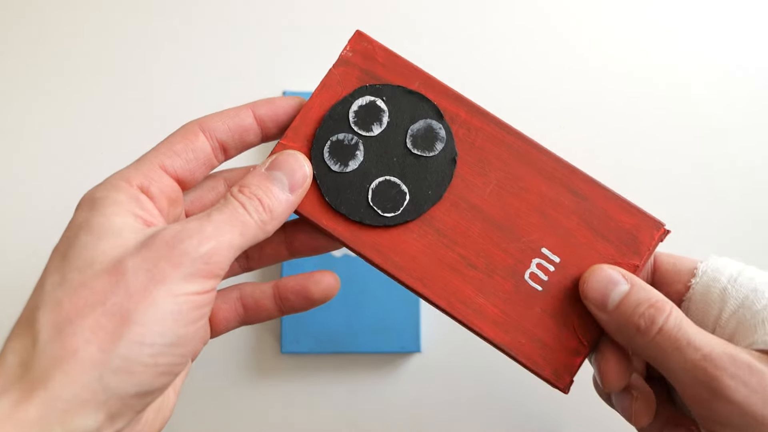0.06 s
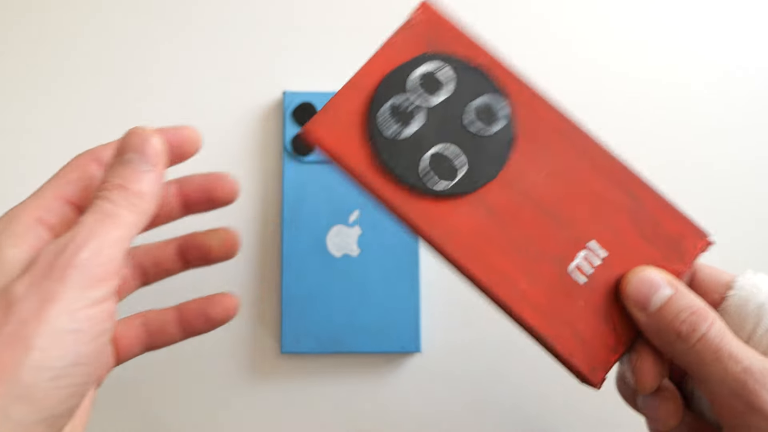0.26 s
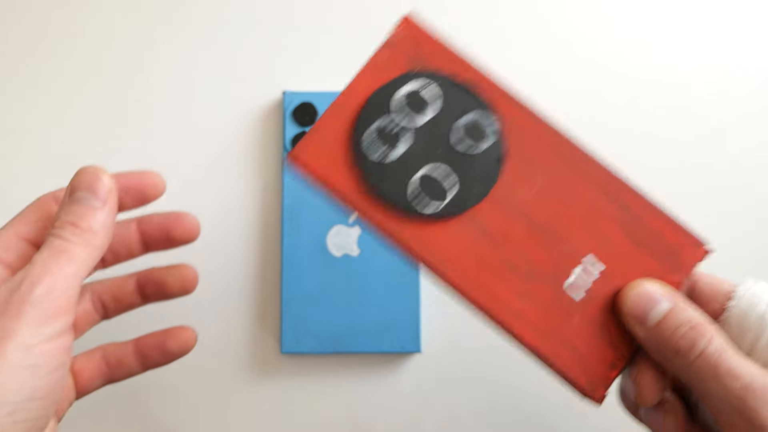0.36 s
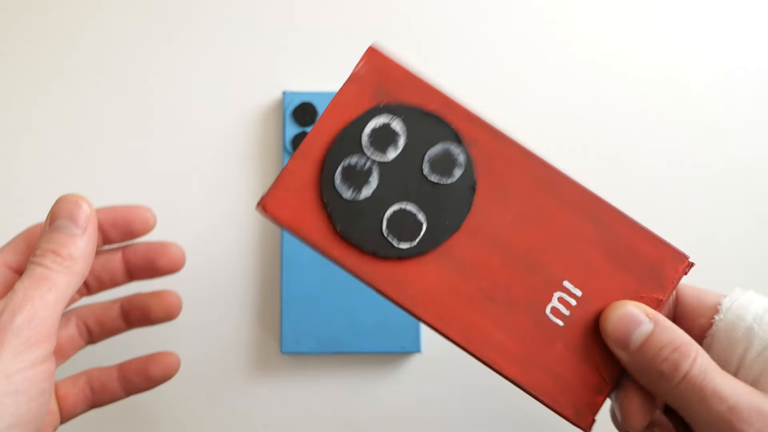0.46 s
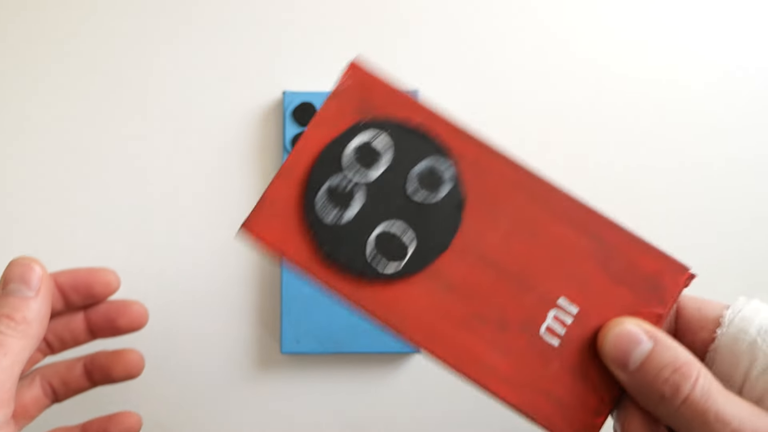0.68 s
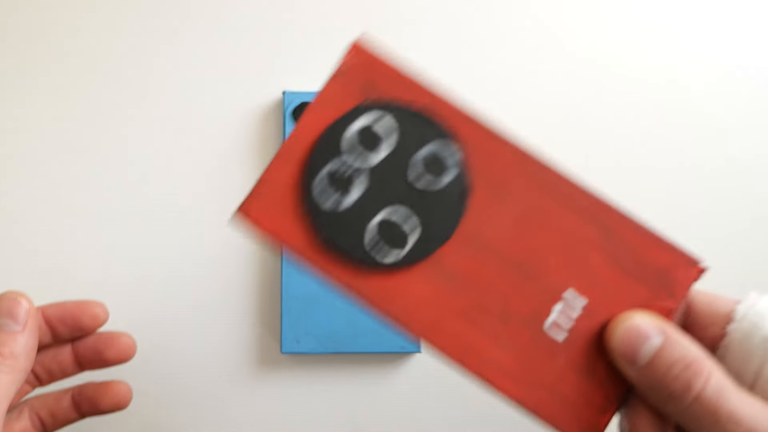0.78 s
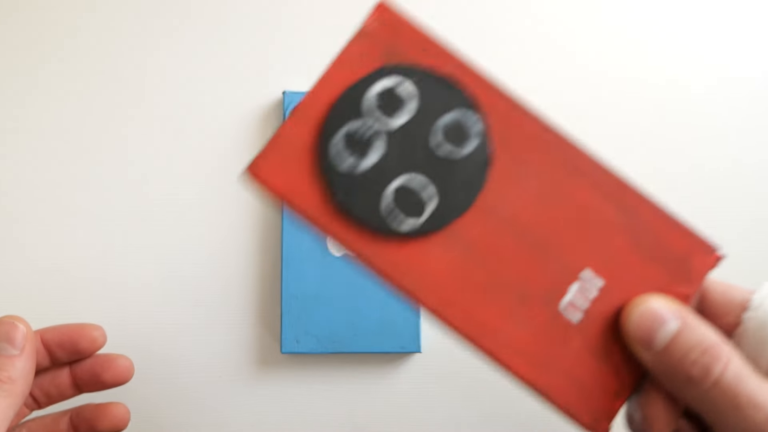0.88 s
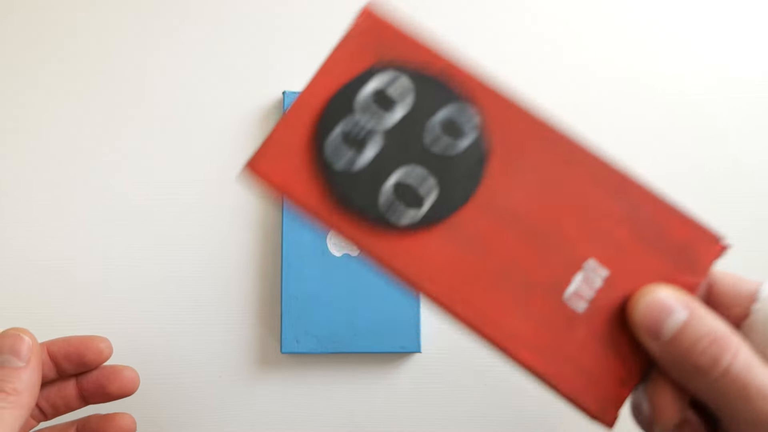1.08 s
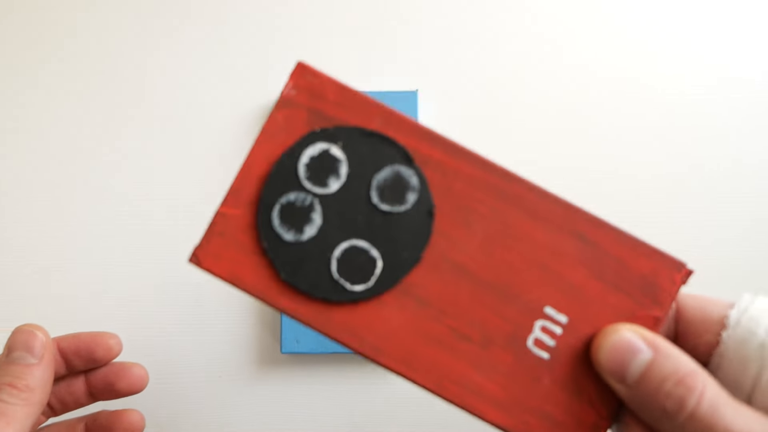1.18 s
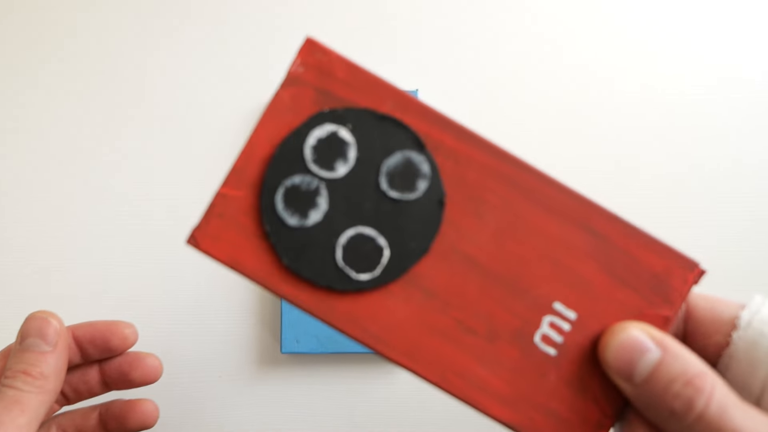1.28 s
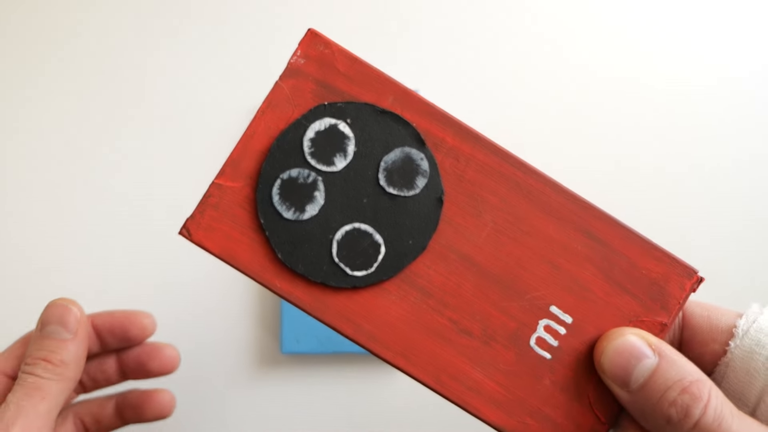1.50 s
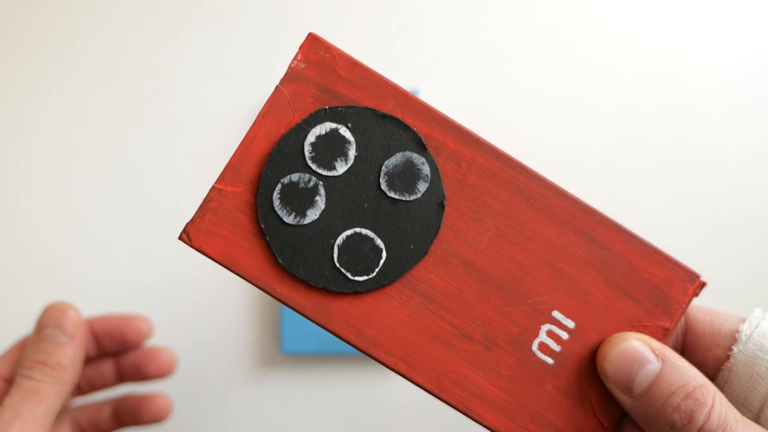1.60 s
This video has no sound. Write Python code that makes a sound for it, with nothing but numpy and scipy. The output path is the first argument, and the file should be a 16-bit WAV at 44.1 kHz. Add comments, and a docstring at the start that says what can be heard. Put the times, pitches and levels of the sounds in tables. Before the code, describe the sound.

Loose grains rattle in a hand-shaken cardboard box, close by in a small room. Fingers softly slide and tap on the card first. From about 0.2 seconds the grains hit the walls in rapid, dry, hollow bursts, about twenty a second, with sharper knocks near 0.5, 0.7 and 1 second. The shaking stops around 1.3 seconds with a brief room ring, and faint finger taps and rubbing follow near 1.5.

```python
"""Shaking a box of grains

A flat cardboard box is shaken by hand, close by in a small room. Fingers slide and tap on the card,
then loose grains are thrown from wall to wall about twenty times a second, each one ticking and
making the panels ring. The hardest swings push soft puffs of air. The shaking stops, the room
rings out and the grip shifts."""
import sys
import numpy as np
from scipy import signal
from scipy.fft import rfft, irfft
from scipy.io import wavfile
from scipy.ndimage import uniform_filter1d, minimum_filter1d

SR = 44100
rng = np.random.default_rng(int(sys.argv[2]) if len(sys.argv) > 2 else 0)


def wav_out(sig):
    """Save sig, one row per channel (or a flat mono array), as 16-bit PCM at SR to the path in sys.argv[1]."""
    wavfile.write(sys.argv[1], SR, np.round(np.clip(np.atleast_2d(sig).T, -1, 1) * 32767).astype(np.int16))


N = 72765
TIME = np.arange(N) / SR
FFT_SIZE = 2 ** 17
HZ = np.maximum(np.arange(FFT_SIZE // 2 + 1) * SR / FFT_SIZE, 1)
OPPOSITE = np.array([[1], [-1]])   # plus in the left ear, minus in the right

# Grains land on a spot of wall that favours one pitch:
# (peak time [s], level [dB], rise [s], extra tick [dB], favoured pitch [Hz], its boost [dB])
THROWS = [(0.19, -36, 0.0082, 1.5, 2600, 10), (0.238, -25.5, 0.0096, -10, 2550, 12.5),
          (.260, -20.5, 0.015, 6, 1840, 8.5), (0.32, -24.5, 0.021, 1, 2500, 9.5),
          (0.37, -13.5, .015, 2, 2270, 3.5), (0.434, -21, 0.014, 6, 2470, 12),
          (0.495, -15.5, 0.016, -2.5, 2330, 7), (0.546, -15, .011, 0, 2500, 5),
          (.585, -21, 0.0072, 3, 2180, 11), (0.621, -16, 0.012, 3, 2100, 1),
          (0.679, -19, 0.019, 1, 2500, 8), (0.729, -16, 0.013, 2.5, 2050, 4),
          (0.794, -17.5, 0.014, 1, 2240, 5.5), (0.856, -19, 0.023, -1.5, 1770, 1.5),
          (0.916, -16.5, 0.022, 1, 1110, 2), (0.971, -17, 0.018, 1.5, 1970, 3.5),
          (1.023, -21.5, 0.013, -1, 1800, 4.5), (1.062, -16, 0.0068, 3, 1090, 0),
          (1.082, -16, 0.012, -0.5, 1860, 6.5), (1.145, -18.5, 0.023, 3.5, 1850, 2.5),
          (1.192, -14.5, 0.014, 1.5, 1040, 0.5), (1.223, -23, 0.018, 0, 1650, 7.5),
          (1.268, -24, 0.025, -2, 1720, 0)]
# One piece hits by itself: (time [s], strength [dB])
KNOCKS = [(.496, 6.5), (.503, 5), (.544, 6.5), (.689, 7.5), (.7215, 7), (0.969, 9.5), (1.079, -8),
          (1.1372, -1), (1.189, -2)]
# The notes of the cardboard panels: (pitch [Hz], width [Hz], level [dB])
PANELS = [(206, 12, -19), (333, 126, -19.5), (505, 122, -14), (762, 123, -12), (909, 164, -3.5),
          (1074, 203, -2.5), (1383, 170, -5.5), (1637, 110, 0), (1843, 192, -0.5), (2142, 330, -2),
          (2547, 180, -4), (2816, 203, -3.5), (3470, 660, -9.5), (4420, 820, -11.5)]
# The tone of a grain's dry tick: (frequency [Hz], relative level [dB])
TICK_COLOUR = [(200, -9.5), (1000, -20), (2500, 1), (4000, 2), (6300, 4), (8500, -4), (11000, -6.5),
               (13000, -5), (15500, -12.5)]
# Fingertips tap the card: (time [s], strength [dB], dulled above [Hz])
TAPS = [(0.0345, -14, 3000), (0.1165, -17, 3500), (0.1297, -15.5, 2400), (0.134, -9, 2800),
        (.182, -18, 3000), (1.444, -14, 3230), (1.4615, -12.5, 1800), (1.4642, -12.5, 1720)]
# Fingers rub the card: (time [s], level [dB])
RUB_LEVELS = [(0, -40.5), (.04, -42), (.098, -40), (.112, -47.5), (.17, -46.5), (1.40, -43.5),
              (1.44, -57.5), (1.49, -57), (1.54, -61.5), (1.575, -57), (1.65, -67)]
# The tone of the rubbing: (frequency [Hz], relative level [dB])
RUB_COLOUR = [(150, -32), (450, -12.5), (620, -20), (1000, 1), (1350, 0), (1900, 7.5), (2350, 2), (2850, 7),
              (3500, -2), (6000, -13), (10000, -20.5), (15500, -24)]
# Air pushed by the hardest swings: (time [s], level [dB])
PUFFS = [(.50, -67), (.722, -46), (1.19, -52)]
# How the box reaches the ears: (frequency [Hz], left-right likeness [0-1], left minus right [dB])
STEREO = [(200, 0.48, 0.5), (600, 0.95, 2), (1240, 1, 0.3), (2200, 0.92, -1.5), (4500, 0.89, -1),
          (9000, 0.73, 0.3), (15000, .88, 0.5)]
# The tone of the quiet background: (frequency [Hz], relative level [dB])
BACKGROUND_COLOUR = [(30, -38), (110, -22), (210, -3), (400, 7.5), (900, 12), (2000, -17), (5000, -6),
                     (15000, -10)]

GRAINS_PER_S, TYPICAL_THROW_DB = 5000, -17   # louder throws than this have more hits a second
THROW_FALL_DB_PER_S, SPOT_WIDTH_OCTAVES = 230, 0.21
BOX_LOW_CUT_HZ = 239
TICK_DB, SCUFF_S = -11.5, 0.0012
CRACK_DB, CRACK_ABOVE_HZ = -20, 10000
PUFF_S, PUFF_BELOW_HZ, SWISH_DB = 0.009, 110, -71
PAN_DB, PAN_DB_PER_S = -1.5, 0.5   # left minus right: the box drifts from the right towards the middle
ROOM_DB, ROOM_DELAY_S, ROOM_WIDTH = -9, 0.0056, 0.49
ROOM_FADE_S, TREBLE_FADE_S = 0.5, 0.41   # time to fall by 60 dB
BACKGROUND_DB = -61


def box():
    """Grains, knocks and taps make the cardboard panels ring briefly; grains also tick."""
    throws = throw_powers()
    power = throws.sum(axis=0)
    tick_db, spot_hz, spot_db = np.transpose(THROWS)[3:]
    force = np.sqrt(power) / from_db(TYPICAL_THROW_DB)
    grains = contacts(power, GRAINS_PER_S * np.sqrt(force), spread_db=2)
    knocks, taps = clicks_at(KNOCKS), finger_taps()
    rings = 0
    for k, (hz, width, db) in enumerate(PANELS):
        spot_boost = from_db(spot_db * np.exp(-(np.log2(hz / spot_hz) / SPOT_WIDTH_OCTAVES) ** 2))
        boosted_grains = grains * np.sqrt(spot_boost ** 2 @ throws / power)
        push = to_ears(boosted_grains + knocks, hz) + taps * (-1) ** k
        rings = rings + from_db(db) * resonance(push, hz, width)
    # make up for the power lost in the narrow resonances
    rings *= np.sqrt(SR / np.pi / sum(width * from_db(db) ** 2 for hz, width, db in PANELS))
    tick_power = from_db(tick_db) ** 2 @ throws
    bright = ticks(grains * np.sqrt(tick_power / power)) + cracks(tick_power)
    return butter(rings + bright, BOX_LOW_CUT_HZ, "high", order=4)


def throw_powers():
    """The power of each throw over time: it swells as the grains land, then dies away."""
    powers = []
    for peak_s, db, rise_s, *_ in THROWS:
        swell = np.exp(-(np.minimum(TIME - peak_s, 0) / rise_s) ** 2)
        fall = from_db(db - THROW_FALL_DB_PER_S * np.maximum(TIME - peak_s, 0))
        powers.append(swell * fall ** 2)
    return np.array(powers) + 1e-14


def ticks(grains):
    """Each grain scuffs the card for a moment, making a tiny burst of bright noise."""
    decay = np.exp(-1 / (SCUFF_S * SR))
    scuffs = np.sqrt(signal.lfilter([1 - decay], [1, -decay], grains ** 2 + 1e-18))
    return from_db(TICK_DB) * colour(to_ears(scuffs, hz=8000), TICK_COLOUR)


def cracks(power):
    """Hard throws add crisp, very high cracks."""
    hardness = (np.sqrt(power) / from_db(TYPICAL_THROW_DB)) ** 0.98
    clicks = contacts(power, per_s=1800, spread_db=3) * hardness
    return from_db(CRACK_DB) * butter(to_ears(clicks, hz=13000), CRACK_ABOVE_HZ, "high")


def finger_taps():
    """Soft fingertips give the card dull little clicks."""
    taps = sum(butter(clicks_at([(s, db)]), dull_hz, "low", order=3) for s, db, dull_hz in TAPS)
    return butter(taps, 410, "high", order=1)


def finger_rub():
    """Skin sticks and slips on the card in a fine crackle."""
    level = from_db(np.interp(TIME, *np.transpose(RUB_LEVELS)))
    slips = contacts(level ** 2, per_s=5800, spread_db=5)
    return colour(to_ears(slips, hz=2000), RUB_COLOUR)


def finger_drag(peak_s=1.576, swell_s=0.032, hz=1830, width_hz=260, db=-55):
    """A fingertip drags and the card hums briefly on one note."""
    hum = resonance(resonance(rng.standard_normal(N), hz, width_hz), hz, width_hz)
    swell = np.exp(-((TIME - peak_s) / swell_s) ** 2)
    return from_db(db) * unit_energy(hum) * np.sqrt(N) * swell


def air_puffs():
    """The box pushes air: soft low bumps over a faint swish, mostly on the right."""
    air = unit_energy(butter(rng.standard_normal((2, N)), PUFF_BELOW_HZ, "low")) * np.sqrt(2 * N)
    bumps = sum(from_db(db) * np.exp(-((TIME - s) / PUFF_S) ** 2) for s, db in PUFFS)
    swish = from_db(SWISH_DB) * np.sqrt(throw_powers().sum(axis=0))
    return air * (bumps + swish) * from_db([[-12], [0]])


def room(x):
    """Echoes blur into a tail that is narrow in the bass and loses its treble first."""
    mid, side = rng.standard_normal((2, N))
    noise = mid + ROOM_WIDTH * butter(side, 2100, "high", order=1) * OPPOSITE
    low = butter(noise, 3400, "low", order=1)
    tail = low * from_db(-60 * TIME / ROOM_FADE_S)
    tail += (noise - low) * from_db(-60 * TIME / TREBLE_FADE_S)
    tail *= TIME > ROOM_DELAY_S
    return signal.fftconvolve(x, unit_energy(tail) * np.sqrt(2), axes=1)[:, :N]


def background():
    """The quiet air: a steady hush, mostly the same in both ears."""
    noise = rng.standard_normal(N) + 0.5 * rng.standard_normal((2, N))
    return from_db(BACKGROUND_DB) * colour(noise, BACKGROUND_COLOUR)


def contacts(power, per_s, spread_db):
    """Random clicks of uneven size whose average power follows the given curve."""
    happens = rng.random(N) < per_s / SR
    clicks = happens * from_db(spread_db * np.minimum(rng.exponential(1, N), 4))
    average = uniform_filter1d(clicks ** 2, size=600)
    return clicks * np.sqrt(power / np.maximum(average, 1e-3))


def clicks_at(rows):
    """One click for each (time [s], strength [dB])."""
    clicks = np.zeros(N)
    for s, db in rows:
        clicks[int(s * SR)] = from_db(db)
    return clicks


def to_ears(clicks, hz):
    """Every click comes from another spot, so its sign and its share in each ear vary."""
    alike = np.clip(at_hz(STEREO, hz), 0, 1)
    mid = rng.choice([-1, 1], N) * rng.uniform(0.64, np.sqrt(2), N)
    side = rng.standard_normal(N) * OPPOSITE
    return clicks * (np.sqrt((1 + alike) / 2) * mid + np.sqrt((1 - alike) / 2) * side)


def narrow_bass(x, below_hz=340):
    """Long, low sound waves reach both ears alike."""
    side = butter((x[0] - x[1]) / 2, below_hz, "high", order=1)
    return x.mean(axis=0) + side * OPPOSITE


def resonance(x, hz, width_hz):
    """Ring at one pitch; the wider the resonance, the sooner it dies."""
    decay = np.exp(-np.pi * width_hz / SR)
    feedback = [1, -2 * decay * np.cos(2 * np.pi * hz / SR), decay ** 2]
    return signal.lfilter(np.array([1, 0, -1]) * (1 - decay ** 2) / 2, feedback, x + 1e-18)


def colour(x, spectrum):
    """Give a sound the tone in a table; white noise keeps its power."""
    cepstrum = irfft(np.log(from_db(at_hz(spectrum, HZ))))
    # fold it so that the filter rings only after a click, never before
    cepstrum[1:FFT_SIZE // 2] *= 2
    cepstrum[FFT_SIZE // 2 + 1:] = 0
    response = unit_energy(irfft(np.exp(rfft(cepstrum))))
    return irfft(rfft(x, FFT_SIZE) * rfft(response))[..., :N]


def butter(x, hz, kind, order=2):
    """Keep the "low" or the "high" side of a frequency."""
    return signal.sosfilt(signal.butter(order, hz, kind, fs=SR, output="sos"), x + 1e-18)


def at_hz(table, hz, column=1):
    """Read between a table's rows, giving each octave equal room."""
    rows = np.array(table)
    return np.interp(np.log(hz), np.log(rows[:, 0]), rows[:, column])


def from_db(db):
    """Turn decibels into a gain."""
    return 10 ** (np.asarray(db) / 20)


def unit_energy(x):
    """Scale to an energy of one."""
    return x / np.sqrt(np.sum(x ** 2) + 1e-20)


def scene():
    """The box and fingers a little to the right, with the room, the puffs and the quiet air."""
    near = narrow_bass(box() + finger_rub() + finger_drag())
    direct = near * from_db((PAN_DB + PAN_DB_PER_S * TIME) * OPPOSITE / 2)
    in_room = direct + from_db(ROOM_DB) * room(near)
    ear_balance = from_db(at_hz(STEREO, HZ, column=2) * OPPOSITE / 2)
    heard = irfft(rfft(in_room, FFT_SIZE) * ear_balance)[:, :N]
    return heard + background() + air_puffs()


def record(dry):
    """A fast limiter holds the highest peaks at full scale, then the very top treble is cut."""
    limiter_samples, cutoff_hz = 41, 15800
    allowed = 1 / np.maximum(np.abs(dry).max(axis=0), 1)
    gain = uniform_filter1d(minimum_filter1d(allowed, size=limiter_samples), size=limiter_samples)
    treble_cut = 1 / np.sqrt(1 + (HZ / cutoff_hz) ** 600)
    return irfft(rfft(dry * gain, FFT_SIZE) * treble_cut)[:, :N]


dry = scene()
out = record(dry)
wav_out(out)
```